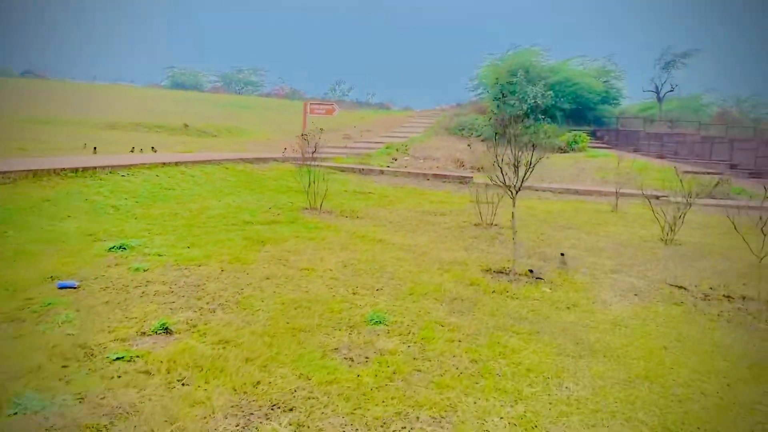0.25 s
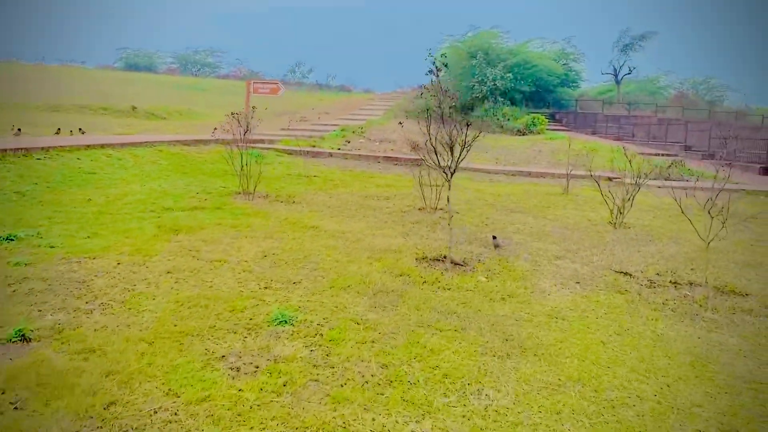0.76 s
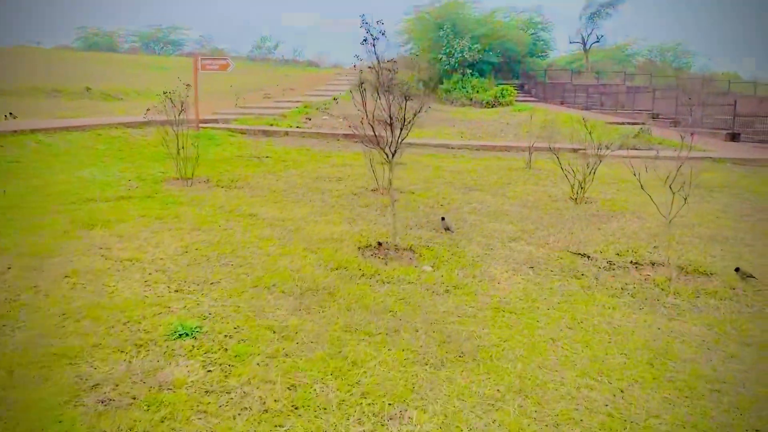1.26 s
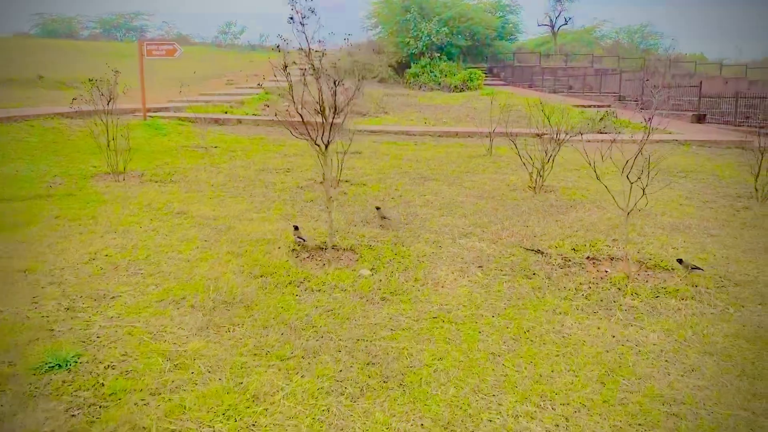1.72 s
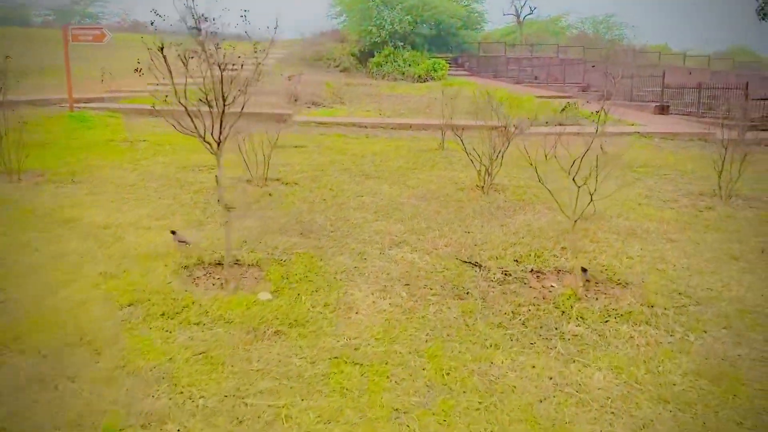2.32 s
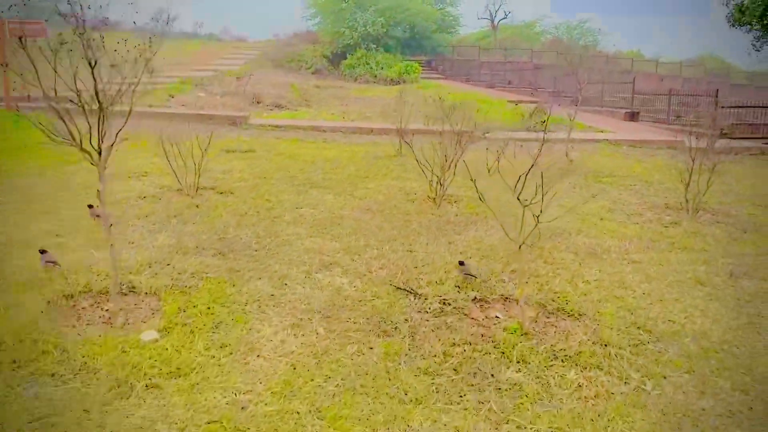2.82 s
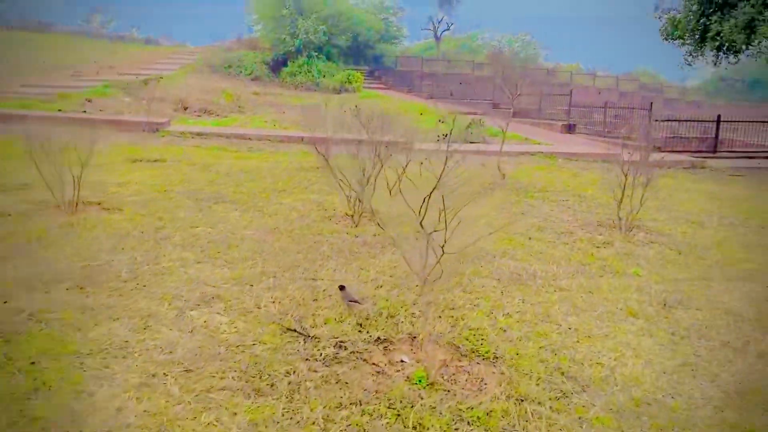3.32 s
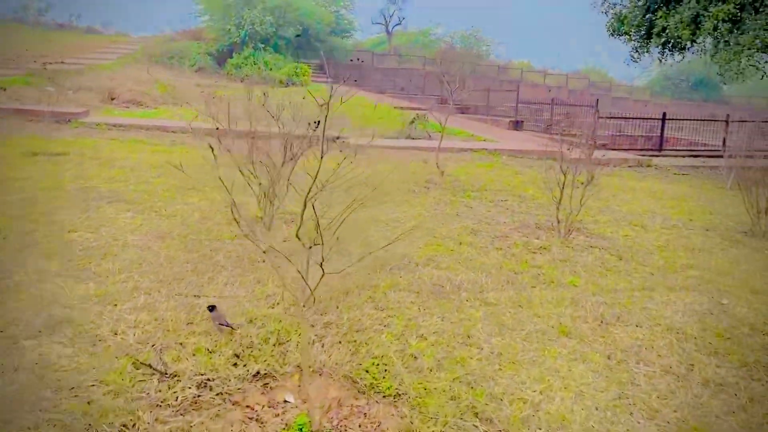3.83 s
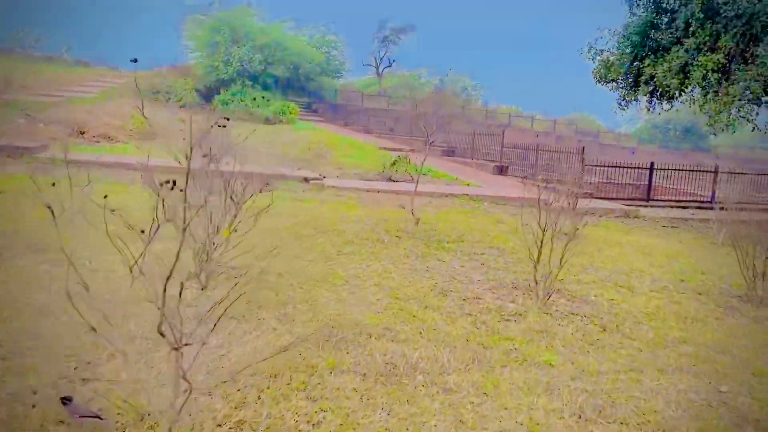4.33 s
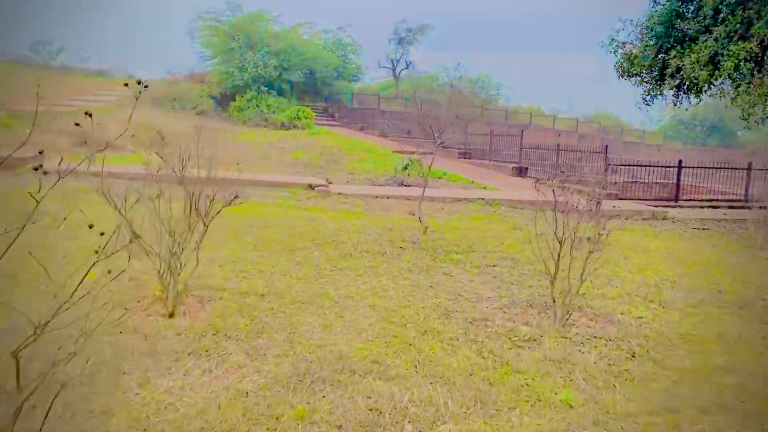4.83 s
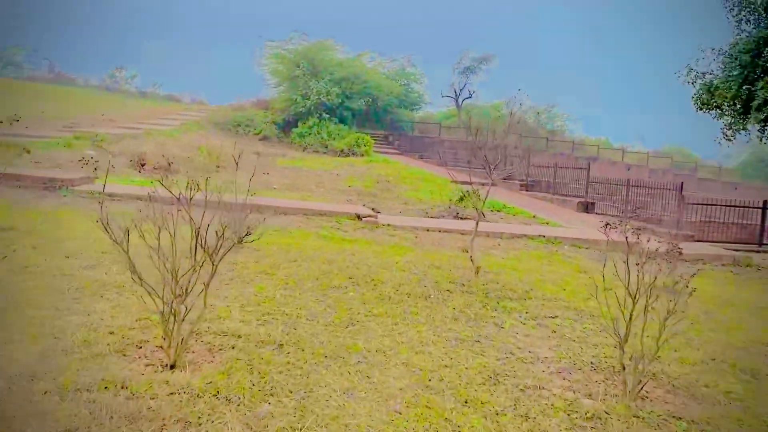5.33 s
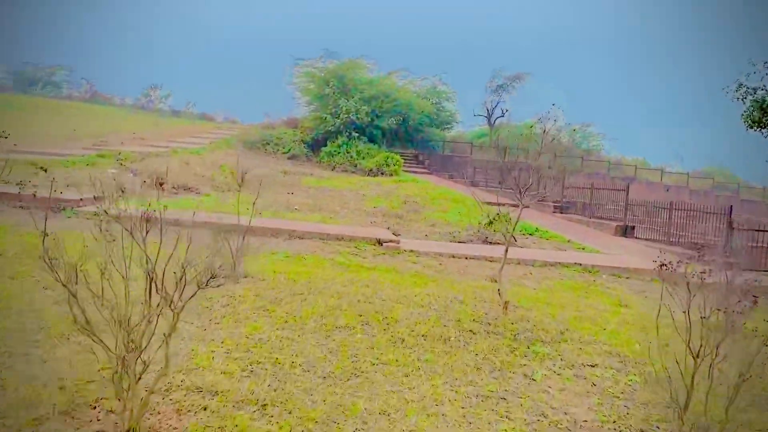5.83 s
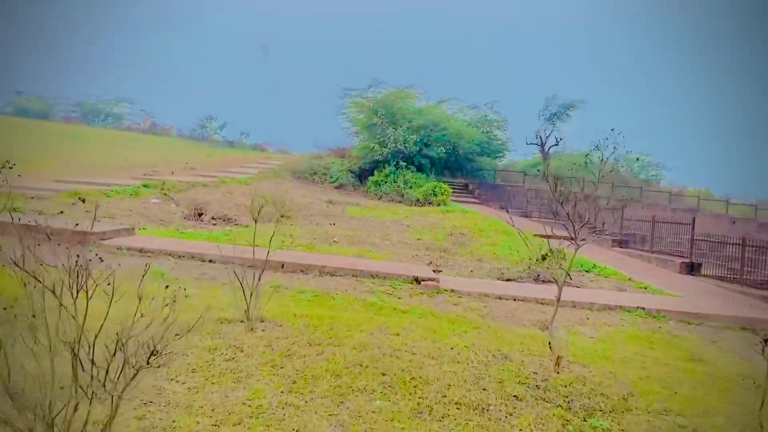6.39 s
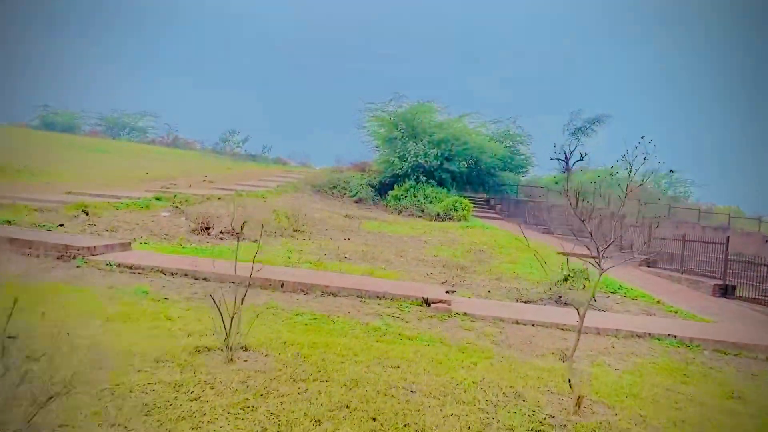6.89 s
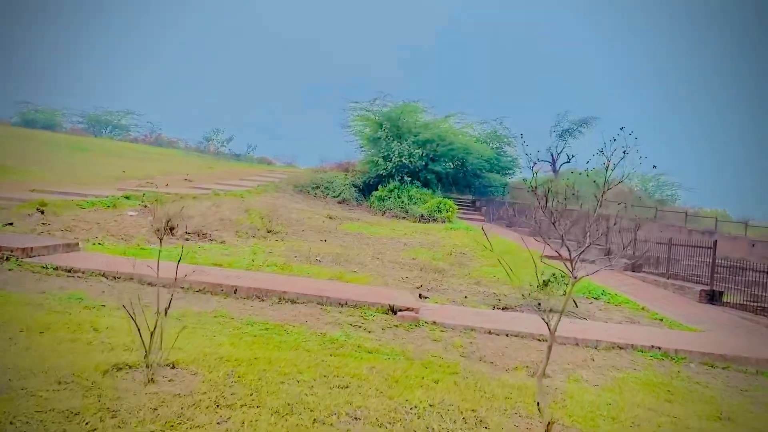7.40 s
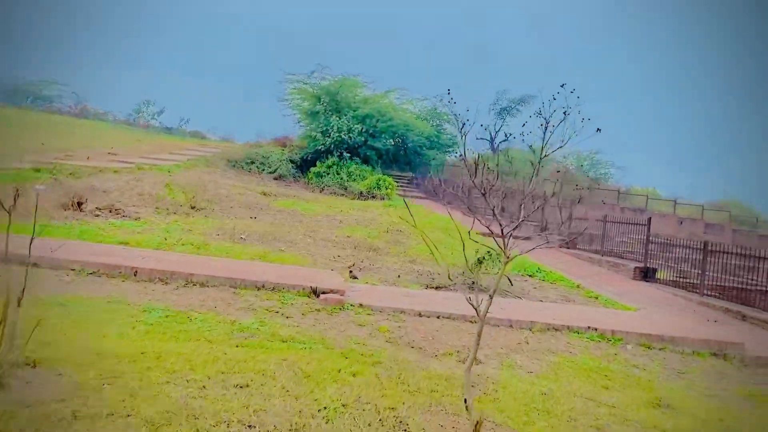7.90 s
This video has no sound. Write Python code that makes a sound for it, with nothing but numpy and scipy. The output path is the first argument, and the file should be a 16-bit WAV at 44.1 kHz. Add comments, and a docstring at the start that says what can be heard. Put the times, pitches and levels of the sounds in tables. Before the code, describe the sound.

Outdoor handheld pickup with birds in front and a faint, thin echo. Bright sliding calls come in quick phrases from the start, with grating rasps at about 1.2, 2.5 and 5 seconds, then a busy tumble of squeaky chatter and clear whistles before sparser falling calls. Light footsteps swish through dry grass, small taps and thumps sound close to the microphone, and a low, uneven rumble continues throughout.

```python
"""Mynas on a park lawn

Mynas call: a high note breaks into a falling slide, then chips, scoops, scratchy chatter and rasps; more birds far off.
Each note is a gliding tone with overtones; a rasp is two voices at once, the low one modulating the high one.
Someone walks over dry grass (swells of crackling noise) with a phone, whose case knocks in the hand (damped sines).
A low outdoor rumble and a hush of air (shaped noise) lie beneath; a thin noise tail echoes the birds."""
import sys
import numpy as np
from scipy import signal
from scipy.fft import rfft, irfft, next_fast_len
from scipy.io import wavfile
from scipy.ndimage import map_coordinates

SR = 44100
rng = np.random.default_rng(int(sys.argv[2]) if len(sys.argv) > 2 else 0)


def wav_record(signal):
    """Record a signal, one row per channel, as 16-bit PCM in the file named by sys.argv[1]."""
    frames = np.transpose(np.atleast_2d(signal))
    bounded = np.clip(frames, -1, 1)
    # unit amplitude maps onto the largest positive 16-bit level
    quanta = np.round(bounded * 32767).astype(np.int16)
    wavfile.write(sys.argv[1], SR, quanta)


N = 359415


def amp(db):
    """Decibels to gain."""
    return 10 ** (np.asarray(db) / 20)


def unit(x):
    """Scale to rms 1."""
    return x / np.sqrt(np.mean(x ** 2) + 1e-20)


def along(points, hz):
    """Interpolate the value columns of a (freq_hz, ..) table on a log axis."""
    freq_hz, *columns = np.transpose(points)
    return np.squeeze([np.interp(np.log(hz + 1), np.log(freq_hz), column) for column in columns])


def wobble(knots_per_s, size=N):
    """Smooth random curve through normally distributed knots."""
    knots = rng.standard_normal(int(size * knots_per_s / SR) + 4)
    return map_coordinates(knots, [np.arange(size) * knots_per_s / SR])


def filtered(x, response):
    """Multiply the spectrum of x by a response, given as a function of Hz."""
    size = next_fast_len(N + SR // 2)
    hz = np.fft.rfftfreq(size, 1 / SR)
    return irfft(rfft(x, size) * response(hz), size)[..., :N]


def add(track, start_s, sound):
    """Mix a sound into a track, clipped to the track's span."""
    part = track[max(0, round(start_s * SR)):][:len(sound)]
    part += sound[:len(part)]


def rush(spectrum, side_db):
    """Coloured stereo noise of rms 1; side_db sets its width."""
    mid, side = filtered(rng.standard_normal((2, N)), lambda hz: amp(along(spectrum, hz)))
    return unit(np.array([mid + amp(side_db) * side, mid - amp(side_db) * side]))


def glide(length_s, *values):
    """Polynomial arc through evenly spaced values."""
    u = np.linspace(0, 1, max(round(length_s * SR), SR // 200))
    knots = np.linspace(0, 1, len(values))
    return np.polyval(np.polyfit(knots, values, len(values) - 1), u)


def phase(hz):
    """Running phase (rad) of a moving frequency."""
    return 2 * np.pi * np.cumsum(hz) / SR


# low rumble, relative: freq_hz, level_db
RUMBLE_SPECTRUM = [(20, -41), (40, -13), (62, 0), (90, -3), (130, -11.5), (200, -22), (400, -30.5),
                   (1000, -84)]
# rumble over time, before its lumps: time_s, level_db
RUMBLE_LEVEL = [(0, -48.5), (2.45, -47.5), (2.56, -38), (2.74, -49), (2.8, -56.5), (3.24, -62), (3.32, -49),
                (8.15, -48.3)]
# open air, relative: freq_hz, level_db
AIR_SPECTRUM = [(100, 10), (330, -3), (500, 7), (650, -6), (1000, -5.5), (1500, -13.5), (2200, -8),
                (3000, -22), (4200, -18), (7500, -27.5), (9000, -41), (12000, -40), (16000, -52)]


def background(air_db=-59, lumps_db=2.6):
    """Lumpy low rumble under the even hush of open air: two shaped noises."""
    level_db = np.interp(np.arange(N) / SR, *np.transpose(RUMBLE_LEVEL))
    rumble = amp(level_db + lumps_db * wobble(17)) * rush(RUMBLE_SPECTRUM, side_db=-14.5)
    drift_db = 1.1 * wobble(3) + 1.7 * wobble(25)
    air = amp(air_db + drift_db) * rush(AIR_SPECTRUM, side_db=-2.8)
    return rumble + air


# dry blades, relative: freq_hz, level_db
GRASS_SPECTRUM = [(150, -26), (500, 15), (1000, 15.5), (2200, 10), (3000, 2.5), (4200, 6), (7500, -6),
                  (9000, -18), (12000, -8), (15500, -26)]
# shoes brushing the grass, Gaussian swells: centre_s, spread_s (one sigma), level_db (before fizz)
SWISHES = [(1, .2, -65), (1.72, .12, -65), (1.98, .045, -60), (2.39, .11, -56.5), (2.97, .092, -56),
           (3.44, .08, -66), (4.14, .04, -61), (4.5, .06, -67), (4.807, .012, -56.5), (5.72, .18, -65),
           (6.48, .13, -60), (7.03, .06, -57), (7.62, .115, -58.5)]


def grass(crackle_db=3, clump_db=2.8, crunch_top_hz=2500, fizz_hz=8800, even_db=-58.5):
    """Steps bend dry blades: crunch and hiss crackle in separate clumps; a light brush is fizzier."""
    t = np.arange(N) / SR
    blades = rush(GRASS_SPECTRUM, side_db=-2) * amp(crackle_db * wobble(700))
    crunch = filtered(blades, lambda hz: hz < crunch_top_hz)
    hiss = blades - crunch
    crackle = unit(sum(band * amp(clump_db * wobble(70)) for band in (crunch, hiss)))
    fizz = filtered(crackle, lambda hz: hz > fizz_hz)
    out = np.zeros((2, N))
    for centre_s, spread_s, level_db in SWISHES:
        swell = amp(level_db) * np.exp(-((t - centre_s) / spread_s) ** 2 / 2)
        extra_fizz = amp((even_db - level_db) / 2) - 1  # zero at even_db
        out += swell * (crackle + extra_fizz * fizz)
    return out


# knocks and thumps on the case: start_s, level_db (before the common gain), pitch_hz (once settled)
KNOCKS = [(.509, -49, 260), (1.065, -47, 520), (1.5, -46, 190), (1.79, -49, 180), (1.845, -46, 140),
          (2.009, -50, 290), (2.52, -44, 110), (2.535, -23, 34), (2.561, -30, 36), (2.68, -32, 35),
          (4.209, -41, 170), (5.437, -47, 140), (5.986, -40, 48), (6.466, -40, 400), (7.013, -45, 200),
          (7.163, -39.5, 165), (7.808, -24.5, 280), (7.822, -36, 430)]


def knocks(decay_cycles=4.72, bend=2.9, sink_per_cycle=2.4, gain_db=1, tap_db=4, tap_hz=400, count=3):
    """Damped pushes on the case start bright and soon sink to pitch; steps jog out light taps too."""
    out, t = np.zeros(N), np.arange(SR // 6) / SR
    taps = []
    for centre_s, spread_s, step_db in SWISHES:
        for when, size, high in rng.standard_normal((count, 3)):
            taps.append((centre_s + spread_s * when, step_db + tap_db + 2 * size, tap_hz * 2 ** (high / 2)))
    for start_s, level_db, pitch_hz in [*KNOCKS, *taps]:
        cycles = t * pitch_hz
        ring = np.sin(phase(pitch_hz * (1 + bend * np.exp(-sink_per_cycle * cycles))))
        decay = amp(level_db + gain_db - 60 * cycles / decay_cycles)  # 60 dB in decay_cycles
        attack = 1 - np.exp(-8 * cycles)
        add(out, start_s, 2 * decay * attack * ring)
    return out


# dry snaps: start_s, level_db (before gain and band filter)
TICKS = [(3.011, -47), (5.5747, -49), (5.8481, -45), (6.0147, -38)]


def ticks(t60_s=0.008, gain_db=5, band_hz=(1500, 4800)):
    """Short dry snaps in the band of the birds: decaying noise."""
    out, t = np.zeros(N), np.arange(SR // 20) / SR
    for start_s, level_db in TICKS:
        decay = amp(level_db + gain_db - 60 * t / t60_s)
        add(out, start_s, decay * rng.standard_normal(len(t)))
    return signal.sosfilt(signal.butter(2, band_hz, "band", fs=SR, output="sos"), out)


def syrinx(hz, overtone_db=-16, jitter=.011, flutter_db=1.9, third_db=-8, edge=.18):
    """Unsteady tone of rms about 1 with two overtones; swells and fades."""
    size = len(hz)
    p = phase(hz * (1 + jitter * wobble(350, size)))
    tone = np.sin(p) + amp(overtone_db) * (np.sin(2 * p) + amp(third_db) * np.sin(3 * p))  # third under second
    swell = unit(np.abs(np.sin(np.linspace(0, np.pi, size))) ** edge)
    return np.sqrt(2) * tone * swell * amp(flutter_db * wobble(149, size))


def overtones(hz, tense_db=-13, slack_db=-26):
    """Overtone level in dB: a tense, high note is rich; a slack, low one is nearly pure."""
    return np.interp(hz, [2100, 2620], [slack_db, tense_db])


def far_flock(level_db=-72.5, pitch_hz=2200, spread=.2, note_s=.04, count=80):
    """Distant birds squabble at random in short, blurred notes of unsteady pitch."""
    out = np.zeros(N)
    starts_s = rng.uniform(0, N / SR, count)
    for start_s, (length, high, bend) in zip(starts_s, rng.standard_normal((count, 3))):
        length_s = note_s * np.exp(.3 * length)
        turns = .06 * np.array([bend, 1, -1])
        hz = glide(length_s, *pitch_hz * np.exp(spread * high + turns))
        add(out, start_s, amp(level_db) * syrinx(hz, overtone_db=-6, jitter=.035, third_db=-20))
    return out


# soft chips, far calls, and low voices before and within rasps: start_s, length_s, middle_hz, level_db
FAINT_NOTES = [(1.445, .045, 4250, -65), (1.528, .04, 3500, -64.5), (4.595, .09, 1200, -66),
               (4.89, .11, 1950, -67.5), (5.8, .065, 1150, -65), (7.475, .06, 2050, -62)]


def faint_notes(sag=.1, blur=.018):
    """Faint notes of slightly blurred pitch that sag from above their middle pitch to below it."""
    out = np.zeros(N)
    for start_s, length_s, middle_hz, level_db in FAINT_NOTES:
        hz = middle_hz * glide(length_s, 1 + sag, 1 - sag)
        add(out, start_s, amp(level_db) * syrinx(hz, jitter=blur))
    return out


# resonances of the throat, also used by the rasps: freq_hz, gain_db
THROAT = [(1700, -4), (2300, 2.5), (2950, -6), (3750, 3), (4600, -7), (7000, -21)]


def nasal(hz, grit_per_s=1300, grit=.42, scratch=.011):
    """Scratchy note of rms 1: harmonics take turns in the throat's resonances as pitch swings."""
    size = len(hz)
    p = phase(hz * (1 + scratch * wobble(grit_per_s, size)))
    note = sum(amp(along(THROAT, k * hz)) * np.sin(k * p) for k in range(1, 4))
    swell = np.sqrt(np.abs(np.sin(np.linspace(0, np.pi, size))))
    return unit(note * swell * (1 + grit * wobble(grit_per_s, size)))


# bouts in which other birds cut in: start_s, end_s
BOUTS = [(.91, 1.05), (5.96, 6.1), (6.21, 6.35), (6.47, 6.62), (6.79, 6.9)]


def squabble(level_db=-61, pitch_hz=2150, spread=.15, note_s=.024, bend=.085, count=8):
    """In each bout, quick scratchy squeaks tumble over one another at random."""
    out = np.zeros(N)
    for first_s, last_s in BOUTS:
        starts_s = rng.uniform(first_s, last_s, count)
        for start_s, (high, *turns) in zip(starts_s, rng.standard_normal((count, 4))):
            hz = glide(note_s, *pitch_hz * np.exp(spread * high + bend * np.array(turns)))
            add(out, start_s, amp(level_db) * nasal(hz))
    return out


# warbling nasal notes: start_s, length_s, middle_hz, level_db, swing (share of pitch), swings_per_s
CHATTER = [(3.565, .042, 1950, -61, .08, 24), (4.025, .036, 1750, -60.5, .08, 28),
           (4.072, .038, 1750, -59, .08, 26), (5.452, .034, 1680, -61, .1, 42),
           (5.592, .08, 2020, -56.5, .1, 11), (5.655, .095, 2060, -54.5, .055, 11),
           (5.762, .06, 1900, -62, .08, 17), (5.962, .054, 2100, -56, .06, 45),
           (6.236, .052, 2020, -53.5, .06, 58), (6.53, .068, 2150, -54, .14, 46),
           (6.826, .062, 2200, -51.5, .16, 45)]


def chatter(wander=.027, stumble_rad=.35, stutter_db=2):
    """Scratchy notes whose pitch warbles and level stutters unevenly."""
    out = np.zeros(N)
    for start_s, length_s, middle_hz, level_db, swing, swings_per_s in CHATTER:
        u = glide(length_s, 0, 1)
        size = len(u)
        warble = np.cos(2 * np.pi * swings_per_s * length_s * u + stumble_rad * wobble(swings_per_s, size))
        hz = middle_hz * (1 - swing * warble + wander * wobble(150, size))
        note = nasal(hz) * amp(stutter_db * wobble(150, size))
        add(out, start_s, amp(level_db) * unit(note))
    return out


# both sides of the syrinx at once: start_s, length_s, high_voice_hz at four even steps (4 columns),
# beat_hz at start, middle and end (3 columns), level_db, pull_rad, under (opening strength of the tone
# a beat below over the high voice)
RASPS = [(1.235, .082, 3050, 3350, 3400, 3150, 1250, 850, 700, -50.5, .92, 0),
         (2.538, .097, 2450, 3250, 3450, 2950, 1350, 870, 720, -50, .75, .3),
         (4.625, .068, 3200, 3700, 3450, 3050, 1300, 1000, 860, -52.5, .85, 0),
         (5.1, .145, 2150, 2880, 2720, 2430, 30, 660, 830, -47, .38, 3),
         (7.47, .085, 4600, 4550, 4300, 3900, 1250, 850, 800, -60.5, .8, .8)]


def rasps(throb=.48, lag_rad=1.5, unsteady=.025, low_voice_db=-5.5, throat_hz=2100, throat_width_hz=1200,
          shake=.052, high_overtone_db=-14.5, under_overtone_db=-9, third_db=-16, late=1.7):
    """The low voice pulls on the high one's pitch and level: side tones a beat apart, hoarse if hard."""
    out = np.zeros(N)
    for start_s, length_s, *pitches, level_db, pull_rad, under in RASPS:
        hz = glide(length_s, *pitches[:4])
        u = np.linspace(0, 1, len(hz))
        hz = hz * (1 + shake * pull_rad ** 2 * u * wobble(900, len(u)))  # hoarser towards the end
        beat_hz = glide(length_s, *pitches[4:]) * (1 + unsteady * wobble(150, len(u)))
        cycle = phase(beat_hz)
        effort = np.abs(np.sin(np.pi * u ** late)) ** .5  # swells in, peaks late

        pulled_hz = hz + pull_rad * beat_hz * np.cos(cycle)
        overtone_db = high_overtone_db + 20 * np.log10(pull_rad)
        high = syrinx(pulled_hz, overtone_db, jitter=0, third_db=third_db)
        high = unit(high * amp(along(THROAT, hz))) * (1 + throb * np.cos(cycle - lag_rad))

        share = under * (1 - u) ** 2  # hands over to the high voice
        below = syrinx(hz - beat_hz, under_overtone_db, jitter=0, third_db=third_db)
        pair = (high + share * below) / (1 + share)

        low = np.zeros(len(u))
        for k in range(1, 7):
            low += np.sin(k * cycle) * np.exp(-((k * beat_hz - throat_hz) / throat_width_hz) ** 2)
        voices = pair + pull_rad ** 2 * amp(low_voice_db) * unit(low)
        add(out, start_s, amp(level_db) * unit(effort * voices))
    return out


# short falling chips: start_s, length_s, middle_hz, level_db
CHIPS = [(.209, .014, 5200, -55.5), (5.098, .028, 3650, -59), (5.408, .034, 4700, -56),
         (5.727, .02, 4050, -56), (6.105, .017, 2300, -53.5), (6.286, .02, 3350, -56.5),
         (6.515, .018, 2400, -55)]
# scoops, where the voice dips and clears: centre_s, length_s, lowest_hz, level_db
SCOOPS = [(.192, .016, 4950, -61), (.535, .06, 3900, -63.5), (.958, .028, 3550, -61),
          (3.683, .022, 2800, -60), (4.067, .018, 2300, -55), (5.984, .017, 3850, -50),
          (6.073, .034, 2120, -53), (6.255, .022, 3600, -52.5), (6.489, .036, 2220, -54)]
# held notes: start_s, length_s, top_hz, level_db
HELD_NOTES = [(1.585, .08, 3680, -69.5), (2.632, .026, 2800, -52), (2.661, .023, 2520, -50),
              (3.803, .032, 1960, -54), (5.053, .04, 4850, -63), (6.022, .036, 2480, -53.5),
              (6.058, .04, 2740, -57), (6.177, .068, 2430, -54), (6.873, .042, 5100, -57)]


def whistles(quiver=.02, scoop_overtone_db=-30, chip_fall_hz=1000, scoop_rim=1.17, arch=.92):
    """Single clear notes: chips fall, scoops dip, held notes arch; rim and arch are end pitch ratios."""
    out = np.zeros(N)
    for start_s, length_s, middle_hz, level_db in CHIPS:
        hz = glide(length_s, middle_hz + chip_fall_hz / 2, middle_hz - chip_fall_hz / 2)
        add(out, start_s, amp(level_db) * syrinx(hz, overtones(hz), jitter=quiver))
    for centre_s, length_s, lowest_hz, level_db in SCOOPS:
        hz = lowest_hz * glide(length_s, scoop_rim, 1, scoop_rim)
        add(out, centre_s - length_s / 2, amp(level_db) * syrinx(hz, scoop_overtone_db, jitter=quiver))
    for start_s, length_s, top_hz, level_db in HELD_NOTES:
        hz = top_hz * glide(length_s, arch, 1, arch)
        add(out, start_s, amp(level_db) * syrinx(hz, overtones(hz)))
    return out


# falling calls: break_s, length_s, first_hz, last_hz, hold (below 0 falls early, above 0 late),
# level_db (before the fade), dip (share of pitch);
# with an opening high note also: head_length_s, head_hz, head_db, drop_s (time constant into the slide)
SLIDES = [(0, .055, 2950, 2180, -1, -57, 0), (.245, .078, 2750, 2200, 2, -55, 0, .024, 3750, -50, .01),
          (.68, .105, 2850, 2080, -3, -50.5, 0, .064, 3330, -51, .005),
          (.976, .11, 2600, 2230, -4, -50.5, .13, .046, 3550, -54, .02),
          (2.215, .1, 2850, 1900, -4, -60, .04), (2.684, .088, 2120, 1800, -2.5, -54, 0),
          (3.33, .12, 2680, 2180, -1.5, -50.5, .12, .054, 3940, -57.5, .005),
          (3.763, .039, 2580, 2400, 3, -50, 0, .07, 3850, -55, .03), (4.207, .125, 2620, 1950, 7, -50, .22),
          (4.684, .124, 2760, 1600, 5, -51.5, .18), (6.62, .12, 2460, 1600, 5.5, -50.5, .07),
          (6.957, .115, 2850, 1750, .5, -53, .08, .038, 3950, -58, .01),
          (7.396, .062, 2500, 1750, -1, -57, .11)]


def calls(head_rise_hz_per_s=2000, dips_per_s=43, fade_db=7):
    """A high note creeps up and breaks into a slide that sinks, fades and drops in short notches."""
    out = np.zeros(N)
    for break_s, length_s, first_hz, last_hz, hold, level_db, dip, *head in SLIDES:
        u = glide(length_s, 0, 1)
        notches = np.sin(np.pi * dips_per_s * length_s * u + .3 * wobble(40, len(u))) ** 8
        fall = np.expm1(hold * u) / np.expm1(hold)
        hz = (first_hz + (last_hz - first_hz) * fall) * (1 - dip * notches)
        add(out, break_s, amp(level_db - fade_db * u ** 3) * syrinx(hz, overtones(hz)))
        if head:
            head_length_s, head_hz, head_db, drop_s = head
            left_s = glide(head_length_s, head_length_s, 0)
            held_hz = head_hz + head_rise_hz_per_s * (head_length_s / 2 - left_s)
            hz = held_hz + (first_hz - held_hz) * np.exp(-left_s / drop_s)
            add(out, break_s - head_length_s, amp(head_db) * syrinx(hz, overtones(hz)))
    return out


def park(x, wet_db, t60_s=.5):
    """Walls and shrubs scatter back a thin decaying noise tail, different at each port."""
    t = np.arange(SR // 2) / SR
    tail = rng.standard_normal((2, len(t))) * amp(-60 * t / t60_s) * (1 - np.exp(-t / 0.005))
    tail /= np.linalg.norm(tail[0])
    return amp(wet_db) * signal.fftconvolve(x[None], tail, axes=1)[:, :N]


# two microphone ports around a case resonance: freq_hz, left_minus_right_db, left_lead_rad
PORTS = [(1520, 9.5, 0.95), (2140, 2.5, -0.42), (2760, 9.5, -2.03), (3113, -5, -2.5), (3610, -2.5, -5),
         (4760, 1, -5)]


def ports(hz):
    """Left and right response to sound from the lawn, at constant total power."""
    balance_db, lead_rad = along(PORTS, hz)
    pair = amp([balance_db / 2, -balance_db / 2]) * np.exp([.5j * lead_rad, -.5j * lead_rad])
    return pair / np.sqrt(np.mean(np.abs(pair) ** 2, axis=0))


def scene(rolloff_hz=7600):
    """Clear birds and their echo, faint notes and far birds half lost in theirs, steps, handling, background."""
    clear = calls() + whistles() + chatter() + rasps() + squabble() + ticks()
    faint = faint_notes() + far_flock()
    # the highest overtones fall away sharply
    clear, faint = filtered(np.array([clear, faint]), lambda hz: 1 / np.sqrt(1 + (hz / rolloff_hz) ** 20))
    birds = filtered(clear + faint, ports) + park(clear, wet_db=-12) + park(faint, wet_db=-5)
    handling = knocks() * amp([[1], [-1]])  # left 2 dB louder
    return birds + grass() + handling + background()


def record(dry, top_hz=15700):
    """The phone keeps nothing above its band limit."""
    return filtered(dry, lambda hz: hz < top_hz)


dry = scene()
out = record(dry)
wav_record(out)
```